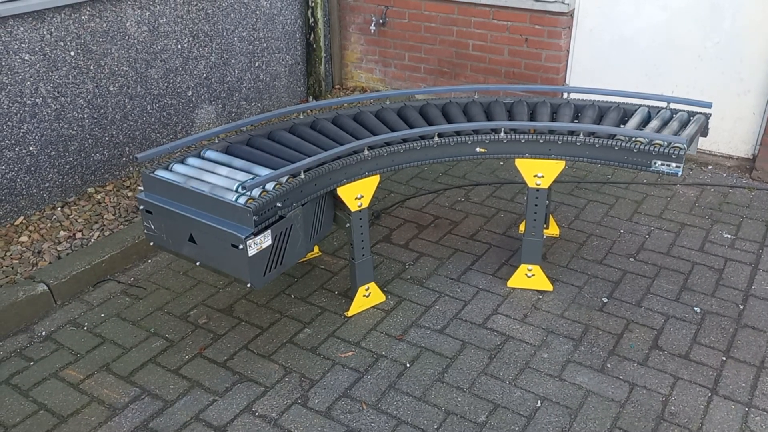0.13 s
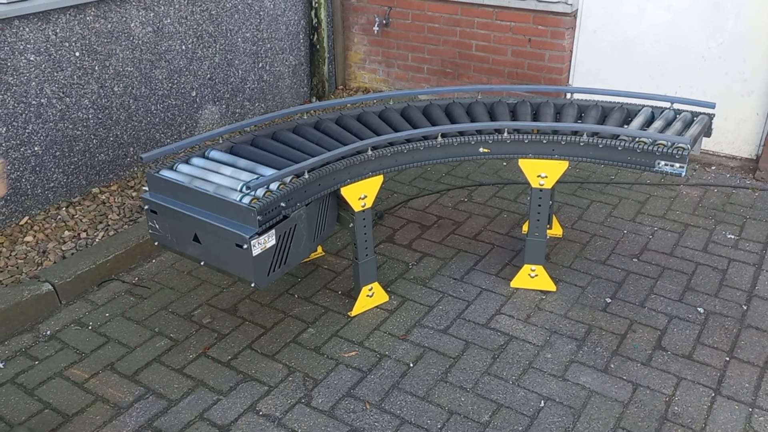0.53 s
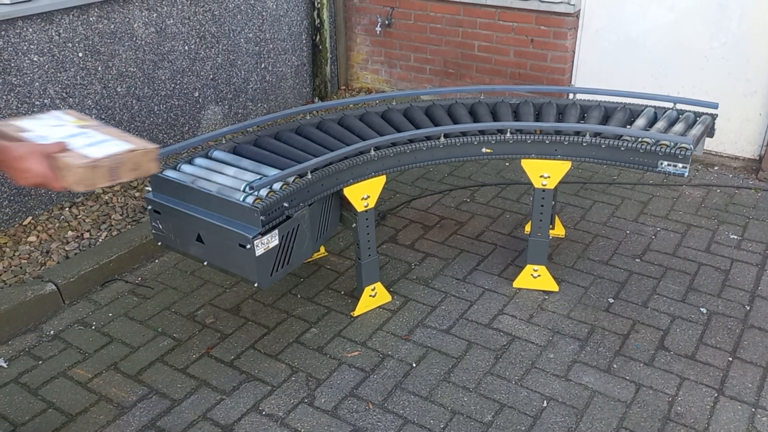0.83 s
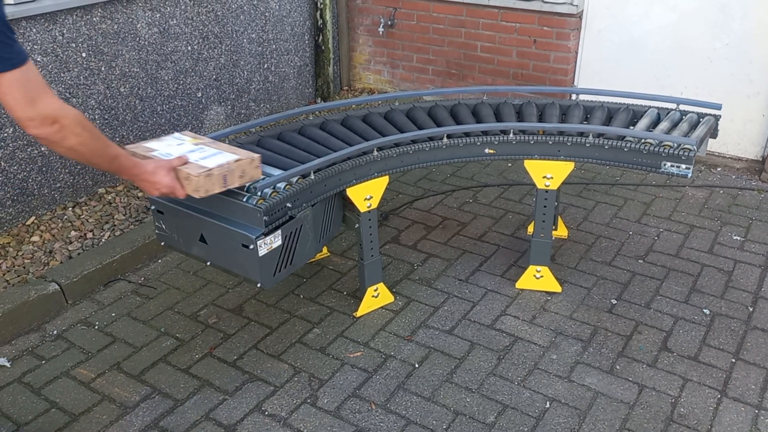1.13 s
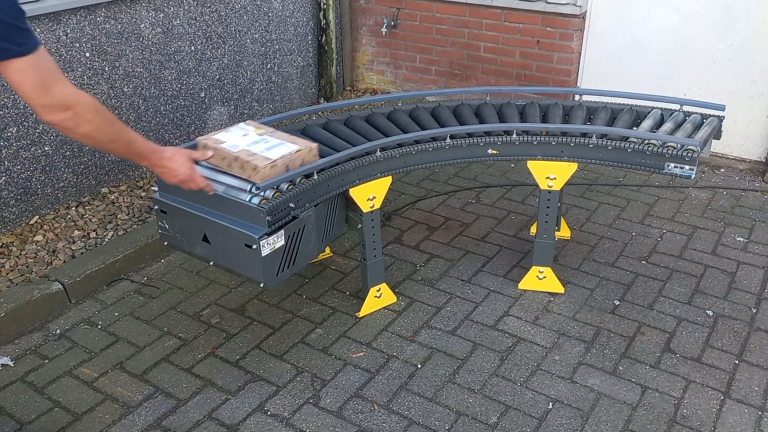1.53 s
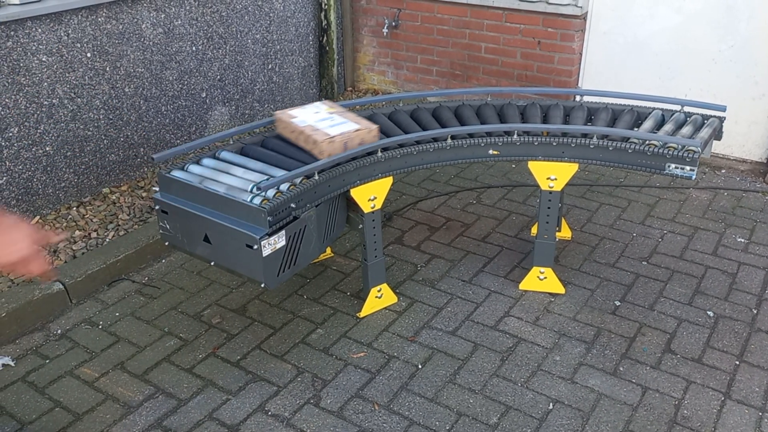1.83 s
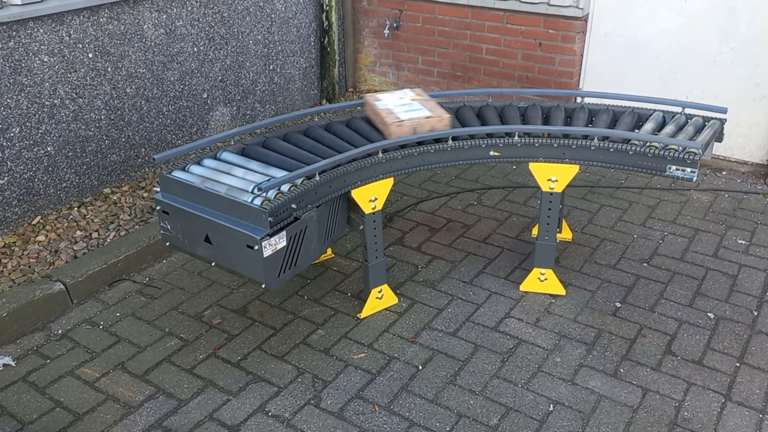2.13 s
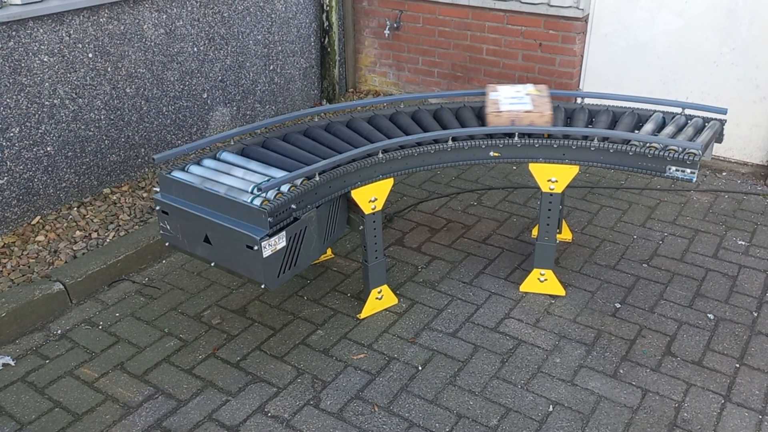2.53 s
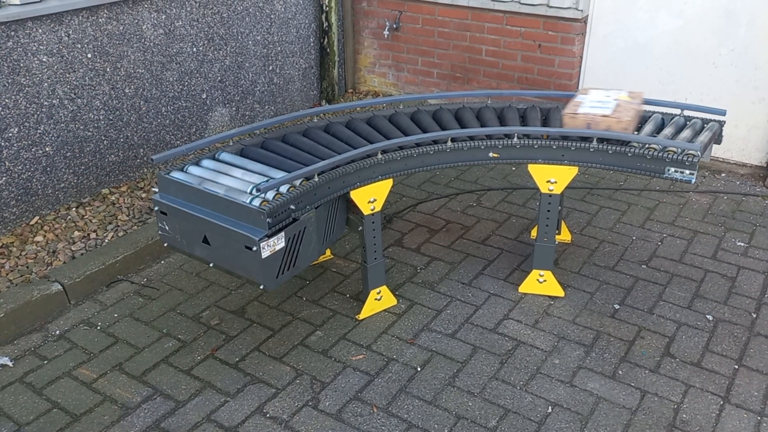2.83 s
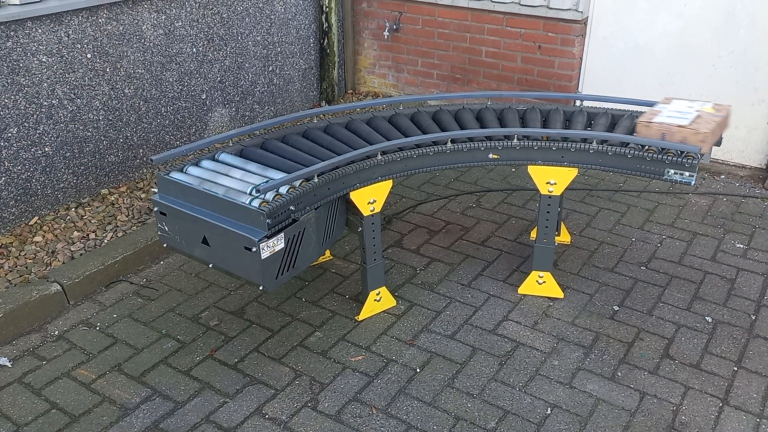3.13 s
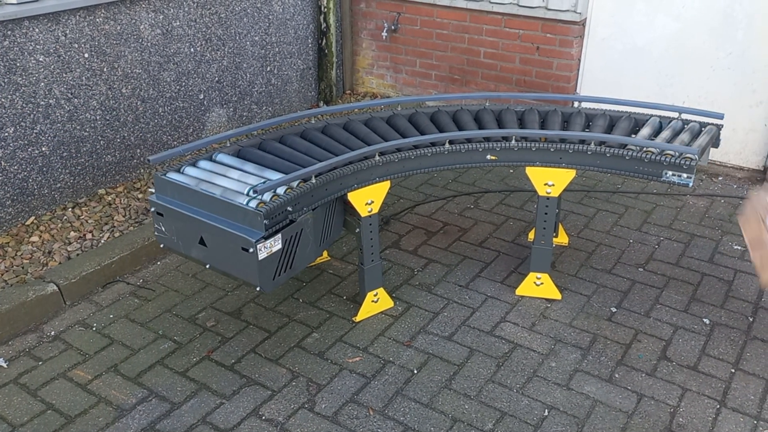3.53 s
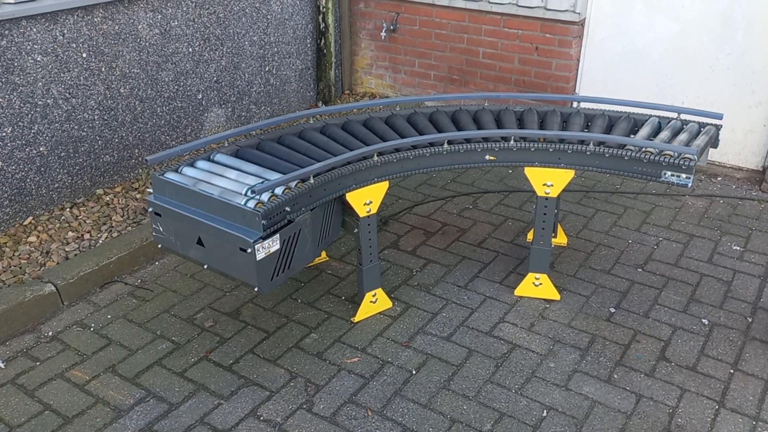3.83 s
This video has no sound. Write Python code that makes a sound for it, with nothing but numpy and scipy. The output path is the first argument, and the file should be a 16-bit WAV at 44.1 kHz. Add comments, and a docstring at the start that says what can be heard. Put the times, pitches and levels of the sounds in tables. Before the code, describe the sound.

A powered roller conveyor drones steadily in a paved yard, with faint whine and tiny ticks. Around 1.3 s a cardboard box is set down with scuffs and soft hollow knocks, then rumbles over rollers until about 3 s, with a tiny squeak near 2.7. It scuffs at 3.3 and lands loudly at 3.7, bouncing until 4, with short wall echo. Rising wind buffets the left; the right is muffled.

```python
"""A paved yard, where a powered roller conveyor drones on. A flat cardboard box is laid on it, knocks
over the rollers, scuffs the end and drops on the paving. Box and rollers are ringing tones with cracks
of noise; drone, whine, scuffs and breeze are shaped noise; ticks and squeaks are brief tones.
A rising breeze buffets the open left microphone port; the right port is covered and muffled."""
import sys
import numpy as np
from scipy import signal
from scipy.fft import rfft, irfft, next_fast_len
from scipy.io import wavfile

SR = 44100
rng = np.random.default_rng(int(sys.argv[2]) if len(sys.argv) > 2 else 0)


def to_wav(sig):
    """Store sig (one row per channel, or 1-D mono) as 16-bit WAV at the path in sys.argv[1].

    Samples outside -1..1 are clipped; the rate is SR.
    """
    pcm = np.clip(np.atleast_2d(sig), -1, 1) * 32767
    pcm = np.round(pcm).astype(np.int16)
    wavfile.write(sys.argv[1], SR, pcm.T)  # frames by channels


N = 176400
T = np.arange(N) / SR  # seconds
SIZE = next_fast_len(N + SR)  # padded length for filtering, in samples


def amp(db):
    """Turn dB into a linear gain."""
    return 10 ** (np.asarray(db) / 20)


def unit(x):
    """Scale to an rms of 1."""
    return x / np.sqrt(np.mean(x ** 2) + 1e-20)


def at_hz(points):
    """Read a (Hz, value) table at every FFT bin, straight lines over log frequency."""
    hz, values = np.transpose(points)
    bins_hz = np.arange(SIZE // 2 + 1) * SR / SIZE
    return np.interp(np.log(bins_hz + 1), np.log(hz), values)


def colour(x, points):
    """Causal minimum-phase filter whose level follows a (Hz, dB) table."""
    log_gain = at_hz(points) * np.log(10) / 20
    # fold the cepstrum onto positive time so that nothing sounds early
    fold = 1 + np.sign(SIZE / 2 - np.arange(SIZE)) - (np.arange(SIZE) == 0)
    response = np.exp(rfft(fold * irfft(log_gain, SIZE)))
    return irfft(rfft(x, SIZE) * response, SIZE)[..., :N]


def curve(rows):
    """Draw a (seconds, dB) table as a line over time, still in dB."""
    s, db = np.transpose(rows)
    return np.interp(T, s, db, left=db[0], right=db[-1])


def drift(rate):
    """Random wander of spread 1: noise under a lowpass near the rate in Hz."""
    step = 40  # samples between wander points
    r = np.exp(-2 * np.pi * rate * step / SR)
    noise = rng.standard_normal(N // step + 2002)
    slow = signal.lfilter([1], [1, -2 * r, r * r], noise)[2000:]  # drop the filter's warm-up
    return np.interp(np.arange(N) / step, np.arange(len(slow)), unit(slow - slow.mean()))


def ring(clicks, hz, t60):
    """Two-pole resonator: a unit click sets off a dying sine that starts from height 1."""
    r, w = amp(-60 / (t60 * SR)), 2 * np.pi * hz / SR
    return signal.lfilter([0, np.sin(w)], [1, -2 * r * np.cos(w), r * r], clicks + 1e-18)


def add(out, s, x):
    """Mix x into out from s seconds on."""
    i = int(s * SR)
    out[i:i + len(x)] += x[:N - i]


def dying(hz, db, t60):
    """A sine that falls 60 dB in t60 seconds."""
    t = T[:int(t60 * SR)]
    return amp(db - 60 * t / t60) * np.sin(2 * np.pi * hz * t)


def spread(x, t60, gap=0.):
    """Scatter into a dying noise tail of unit energy, silent for the first gap seconds."""
    t = T[:int(t60 * SR)]
    tail = rng.standard_normal(SR)[:len(t)] * amp(-60 * t / t60) * (t >= gap)
    return signal.fftconvolve(x, tail / np.sqrt(np.sum(tail ** 2)))[:N]


# Edges of the box meet the paving. Each row: start in seconds, level in dB, crack in dB relative
# to that level, pitch ratio.
LANDING = [(3.692, -10, 2.5, 1.0), (3.7017, -16.5, 9.5, .97), (3.71, -19.5, -2, 0.83),
           (3.742, -27, -4, 0.82), (3.758, -43, 2, 0.8), (3.797, -30.5, 2, 1.11), (3.810, -36, -5, 1.055),
           (3.9242, -22, -3, 0.76), (3.929, -23, 4, 1.24), (3.949, -27, -3, 0.88), (3.976, -36, -5, 0.96),
           (3.989, -41, -2, 1.4)]
# Modes of the box. Each row: frequency in Hz, level in dB, t60 in seconds.
BOX_MODES = [(92, -19, 0.11), (148, -19, .06), (233, -14.5, 0.099), (266, 4, 0.053), (330, -9, 0.072),
             (436, -14, 0.064), (500, -17, 0.094), (620, -10.5, 0.046), (738, -7.5, 0.033),
             (860, -16.5, 0.056), (1005, -11, 0.034), (1188, -18, 0.15), (1396, -22, 0.1),
             (1680, -20, 0.045)]
# Colour of the crack. Each row: frequency in Hz, level in dB.
CRACK_COLOUR = [(200, -37), (500, -8), (1700, -2), (2300, -11), (4000, -10), (8000, -8.5), (12000, -4.5),
                (16000, -7)]
# Colour of the walls' echo. Each row: frequency in Hz, level in dB.
YARD_COLOUR = [(100, -19), (300, -4), (700, 3), (1100, 4), (1700, 0.5), (2600, 4), (4000, 0.5), (16000, -2)]
MAIN_MODE_HZ = BOX_MODES[3][0]
SOFT_DULL = 0.34  # dB lost per octave above the main mode, per dB of softness
BOX_RISE_CYCLES, BOX_LUCK_DB = 0.36, 1.5
BOX_SAG, BOX_SAG_S = 0.14, 0.017  # extra pitch at the strike as a share, time constant of its fall
CRACK_DB, CRACK_T60_S = -10, 0.054
YARD_DB, YARD_T60_S, YARD_GAP_S = -12.5, 0.37, 0.0045


def landing():
    """Each touch rings struck panels that start taut and sag in pitch, and cracks; walls echo it."""
    out, crack, t = np.zeros(N), np.zeros(N), T[:SR // 5]
    taut = t + BOX_SAG * BOX_SAG_S * (1 - np.exp(-t / BOX_SAG_S))
    all_luck = rng.normal(0, BOX_LUCK_DB, (len(LANDING), len(BOX_MODES)))
    for (s, db, crack_db, ratio), luck in zip(LANDING, all_luck):
        dull_db = SOFT_DULL * (db - LANDING[0][1])  # softer touches are duller
        for k, (hz, mode_db, t60) in enumerate(BOX_MODES):
            octaves_up = max(np.log2(hz / MAIN_MODE_HZ), 0)
            start_db = db + mode_db + luck[k] + dull_db * octaves_up
            rise = 1 - np.exp(-t * hz / BOX_RISE_CYCLES)
            shape = amp(start_db - 60 * t / t60) * rise
            sign = (-1) ** (k // 3)
            add(out, s, sign * shape * np.sin(2 * np.pi * hz * ratio * taut))
        add(crack, s, amp(db + crack_db + CRACK_DB - 60 * T[:SR // 2] / CRACK_T60_S))
    out = out + crack * unit(colour(rng.standard_normal(N), CRACK_COLOUR))
    echo = colour(spread(out, YARD_T60_S, YARD_GAP_S), YARD_COLOUR)
    return out + amp(YARD_DB) * echo


# Box bottom meets a roller. Each row: start in seconds, level in dB, pitch in Hz.
KNOCKS = [(1.31, -38, 320), (1.353, -32.5, 338), (1.387, -36, 414), (1.394, -30.5, 263), (1.418, -41, 330),
          (1.892, -36, 288), (1.933, -38.5, 297), (1.968, -37, 318), (2.038, -32.5, 318), (2.053, -39, 315),
          (2.11, -39.5, 330), (2.14, -44, 500), (2.185, -32, 304), (2.204, -36.5, 356), (2.33, -33, 262),
          (2.399, -40, 190), (2.44, -41, 478), (2.474, -34.5, 218), (2.515, -48, 480), (2.552, -41, 227),
          (2.624, -34.5, 181), (2.705, -37.5, 250), (2.774, -33, 234)]
# Tones of one knock. Each row: multiple of the pitch, level in dB, t60 in seconds.
KNOCK_TONES = [(1, 1.5, 0.064), (1.25, -2, 0.032), (1.9, -9.5, 0.036), (3.1, -8.5, 0.021), (5.2, -14, .03)]
KNOCK_RISE_S, KNOCK_LUCK_DB = 0.002, 2.5


def knocks():
    """Hollow knocks: a few dying tones with a soft onset, each knock on its own pitch."""
    out = np.zeros(N)
    all_luck = rng.normal(0, KNOCK_LUCK_DB, (len(KNOCKS), len(KNOCK_TONES)))
    for (s, db, hz), luck in zip(KNOCKS, all_luck):
        for (multiple, tone_db, t60), more_db in zip(KNOCK_TONES, luck):
            tone = dying(multiple * hz, db + tone_db + more_db, t60)
            add(out, s, tone * (1 - np.exp(-T[:len(tone)] / KNOCK_RISE_S)))
    return out


# Level of the box riding the rollers. Each row: time in seconds, level in dB.
RUMBLE = [(1.2, -58), (1.32, -49), (1.4, -46.5), (1.46, -51), (1.8, -54), (1.92, -49.5), (2.2, -48.5),
          (2.3, -52), (2.46, -46), (2.58, -52.5), (2.8, -54.5), (3.0, -49.5), (3.66, -59)]
# Modes of the rollers. Each row: frequency in Hz, level in dB, t60 in seconds.
ROLLERS = [(200, -3.5, 0.09), (234.6, -1, 0.083), (300, 0, 0.09), (353, 3, 0.048), (469, -3, 0.077),
           (563, -14, 0.061), (766, -1, 0.025), (938, 0, .03), (1320, -8, 0.03), (1560, -1.5, 0.02),
           (2300, -7, 0.024)]
RUMBLE_PER_S, RUMBLE_SPREAD_DB = 400, 3.5  # contacts per second, spread of their strength


def rumble():
    """Dense small contacts set the rollers ringing while the box rides."""
    strength = amp(RUMBLE_SPREAD_DB * np.minimum(rng.exponential(1, N), 4))
    clicks = strength * (rng.random(N) < RUMBLE_PER_S / SR)
    out = sum(amp(db) * ring(clicks * rng.standard_normal(N), hz, t60) for hz, db, t60 in ROLLERS)
    fade_in = np.clip((T - RUMBLE[0][0]) / 0.1, 0, 1)
    fade_out = np.clip((RUMBLE[-1][0] - T) / 0.033, 0, 1)
    return amp(curve(RUMBLE)) * fade_in * fade_out * unit(out)


# Short rubbing hisses. Each row: start in seconds, level in dB, length in seconds before the fade,
# dull part in dB relative to the bright part.
SCUFFS = [(0.248, -52.5, 0.1, -23), (0.37, -50, 0.047, -14), (1.305, -42, 0.018, -8.5),
          (1.344, -38.5, .004, -15), (1.361, -54, .004, -8), (1.38, -52.5, 0.033, 6), (1.63, -54, .02, -19),
          (2.324, -63.5, 0.091, 11), (2.469, -59, 0.062, 7.5), (2.729, -54, 0.021, 1),
          (3.315, -37, 0.0066, -14), (3.322, -40.5, 0.0033, -17.5), (3.336, -55, .01, -10),
          (3.726, -44, 0.03, -12), (3.94, -48, 0.016, -3.5)]
# Colour of the bright part. Each row: frequency in Hz, level in dB.
SCUFF_BRIGHT = [(300, -41), (1500, -26), (2100, 2), (4000, -4), (6200, 4.5), (10000, 6), (16000, 8)]
# Colour of the dull part. Each row: frequency in Hz, level in dB.
SCUFF_DULL = [(150, -25), (500, 1.5), (1500, -1), (4500, -8.5), (7000, -17), (16000, -31)]
SCUFF_EDGE_S, SCUFF_FADE_S, SCUFF_GRIT_DB = 0.0042, 0.016, 4


def scuffs():
    """Rubbing as gritty noise, a bright and a dull part, under soft-edged windows."""
    bright, dull = np.zeros(N), np.zeros(N)
    for s, db, long, dull_db in SCUFFS:
        edge = np.clip((T - s) / SCUFF_EDGE_S, 0, 1)
        fade = np.exp(-np.maximum(T - s - long, 0) / SCUFF_FADE_S)
        bright += amp(db) * edge * fade
        dull += amp(db + dull_db) * edge * fade
    bright_noise = unit(colour(rng.standard_normal(N), SCUFF_BRIGHT))
    dull_noise = unit(colour(rng.standard_normal(N), SCUFF_DULL))
    grit = amp(SCUFF_GRIT_DB * drift(150))
    return grit * (bright * bright_noise + dull * dull_noise)


# Tiny bright ticks. Each row: start in seconds, level in dB, frequency in Hz.
TICKS = [(0.0714, -25, 9100), (0.6327, -32, 9100), (0.8276, -39, 9500), (1.1994, -39, 9500),
         (1.6394, -41, 8500), (3.647, -36.5, 6200)]
TICK_T60_S = 0.0015


def ticks():
    """Very short rings of three tones."""
    out = np.zeros(N)
    for s, db, hz in TICKS:
        for multiple, more_db in [(1, 0), (0.59, -16), (1.32, 6.5)]:
            add(out, s, dying(multiple * hz, db + more_db, TICK_T60_S))
    return out


# A bearing squeaks. Each row: start in seconds, level in dB, length in seconds.
SQUEAKS = [(2.73, -49.5, 0.012), (2.746, -54, .008)]
# Tones of a squeak. Each row: frequency in Hz, level in dB.
SQUEAK_TONES = [(2080, 0), (3230, -1), (7700, 1)]


def squeaks():
    """Bearing squeaks: three steady tones under a half-sine swell."""
    out = np.zeros(N)
    for s, db, long in SQUEAKS:
        t = T[:int(long * SR)]
        tones = sum(amp(db + tone_db) * np.sin(2 * np.pi * hz * t) for hz, tone_db in SQUEAK_TONES)
        add(out, s, np.sin(np.pi * t / long) * tones)
    return out


# A tap on the right port's cover. Each row: frequency in Hz, level in dB, t60 in seconds.
TAP = [(216, -32.5, 0.074), (110, -42, 0.16), (820, -30, 0.013)]
TAP_S = 0.363


def tap():
    """A tap on the cover rings a few dying tones at once."""
    out = np.zeros(N)
    for hz, db, t60 in TAP:
        add(out, TAP_S, dying(hz, db, t60))
    return out


# Rumble of air on the left port. Each row: time in seconds, level in dB.
BREEZE = [(0, -49.5), (.12, -68), (.3, -56.5), (.45, -48.5), (.55, -70), (1.22, -62), (1.3, -50),
          (1.42, -56), (1.65, -71.5), (1.86, -77), (2.15, -50.5), (2.28, -61), (2.5, -51), (2.96, -47),
          (3.24, -41.5), (3.5, -36.5), (3.65, -47), (4.0, -36.5)]
# Eddies hitting the left port. Each row: centre in seconds, level in dB, frequency in Hz.
BUFFETS = [(0.455, -40, 94), (1.296, -36.5, 99), (2.422, -45, 92), (2.529, -37, 110), (2.637, -36.5, 113),
           (2.892, -39, 102), (2.912, -47, 111), (3.008, -29.5, 148), (3.023, -24, 110), (3.124, -39, 107),
           (3.164, -34, 89), (3.209, -31, 110), (3.288, -37.5, 148), (3.328, -31.5, 112),
           (3.36, -27.5, 109), (3.396, -25, 99), (3.451, -30, 99), (3.474, -29.5, 123), (3.539, -28, 106),
           (3.59, -43, 136), (3.67, -43, 121), (3.808, -20.5, 166), (3.841, -39, 106), (3.865, -24, 112),
           (3.895, -23, 196), (3.913, -23, 93), (0.387, -52, 110), (.418, -46, 119), (0.301, -48, 98),
           (1.33, -35.5, 149), (1.359, -39.5, 121), (1.579, -46.5, 89.5), (1.94, -42.5, 101),
           (3.517, -28.5, 200), (3.559, -36, 130), (3.688, -22.5, 137), (3.82, -26.5, 112),
           (3.879, -40, 110), (3.965, -34, 122)]
BREEZE_HZ, BREEZE_LUMPY_DB, LUMPS_PER_S = [53.6, 130], 4.5, 12.4
BUFFET_CYCLES = 0.67  # half width of the swell


def wind():
    """Air on the open port: lumpy low noise plus single eddies, each a brief low swell."""
    band = signal.butter(2, BREEZE_HZ, "band", fs=SR, output="sos")
    low_noise = signal.sosfilt(band, rng.standard_normal(N))
    lumps = amp(BREEZE_LUMPY_DB * drift(LUMPS_PER_S))
    out = amp(curve(BREEZE)) * unit(lumps * low_noise)
    phases = rng.uniform(0, 2 * np.pi, len(BUFFETS))
    for (s, db, hz), phase in zip(BUFFETS, phases):
        cycles = hz * (T[:SR // 10] - .05)  # counted from the centre
        swell = np.exp(-(cycles / BUFFET_CYCLES) ** 2)
        add(out, s - .05, amp(db) * swell * np.sin(2 * np.pi * cycles + phase))
    return out


# Drive whine. Each row: frequency in Hz, width in Hz, level in dB.
HUM = [(484.8, 6.7, -63.5), (552.5, 7.6, -65), (1112, 11, -68), (1202, 11, -70)]


def hum():
    """Faint wavering lines of the drive: noise in narrow resonances."""
    out = np.zeros(N)
    for hz, width, db in HUM:
        t60 = np.log(1000) / np.pi / width
        out += amp(db) * unit(ring(rng.standard_normal(N), hz, t60))
    return out


# How alike the ports are. Each row: frequency in Hz, share common to both ports from 0 to 1.
LIKENESS = [(60, 0.94), (300, 0.9), (600, 0.98), (1100, 1), (1600, 0.13), (16000, .1)]


def both_ports(x, other):
    """The right port hears a share of the left's sound, the rest by another path."""
    alike = np.clip(at_hz(LIKENESS), 0, 1)
    right = alike * rfft(x, SIZE) + np.sqrt(1 - alike ** 2) * rfft(other, SIZE)
    return np.array([x, irfft(right, SIZE)[:N]])


# Colour of drive, belts and far traffic. Each row: frequency in Hz, level in dB.
DRONE = [(40, -14.5), (70, -9.5), (130, -7), (260, 0.5), (350, 0), (440, -0.5), (520, -4), (620, -5),
         (850, -11.5), (1200, -3.5), (1500, -7), (1850, -12), (2500, -10), (7000, -15), (11000, -15.5),
         (16000, -14.5)]
DRONE_DB, DRONE_PATCHY_DB = -48.5, 0.66


def drone():
    """Drive, belts and traffic as coloured noise; octave bands waver a little, each in its own way."""
    white, out = both_ports(rng.standard_normal(N), rng.standard_normal(N)), 0
    spectrum = rfft(white)
    octave = np.log2(np.arange(N // 2 + 1) * SR / N / 60 + 1e-9)  # counted from 60 Hz
    for k in range(9):
        share = np.clip(1 - np.abs(np.clip(octave, 0, 8) - k), 0, 1)
        out = out + irfft(spectrum * share, N) * amp(DRONE_PATCHY_DB * drift(3.9))
    return amp(DRONE_DB) * unit(colour(out, DRONE))


PORTS_APART_T60_S = 0.03


def scene():
    """Box and conveyor reach both ports, the breeze only the left, the tap only the right."""
    box = landing() + knocks() + rumble() + scuffs() + ticks() + squeaks() + hum()
    left, right = drone() + both_ports(box, spread(box, PORTS_APART_T60_S))
    return np.array([left + wind(), right + tap()])


# Response of the open left port. Each row: frequency in Hz, level in dB.
OPEN = [(25, -17.5), (60, 4.5), (100, 6), (2500, 3.5), (2900, 0.5), (3250, 7), (3800, 5), (5200, 4),
        (5600, -2.5), (6600, -3.5), (7000, -1), (8300, -11), (9500, -9.5), (12000, -10), (15000, -9.5),
        (15800, 2), (16000, -6), (16300, -37)]
# Response of the covered right port. Each row: frequency in Hz, level in dB.
COVER = [(25, -33), (60, -13), (100, -6), (350, -8.5), (520, -4.5), (600, -1), (850, -8.5), (1150, -8.5),
         (1600, -7.5), (2050, 3.5), (2400, -5.5), (2600, 0.5), (3000, -29), (3450, -14), (4000, -24.5),
         (5200, -29.5), (5600, -40), (16000, -42)]
# Colour of the right port's hiss. Each row: frequency in Hz, level in dB.
HISS = [(5000, -2), (9500, 0), (12000, 4.5), (16000, 1)]
LAG_S, HISS_DB, CUTOFF_HZ = 0.00015, -82.5, 16450
TOP = 1.13  # peaks are rounded towards this height


def record(dry):
    """Open left port, muffled late right port with faint hiss; peaks rounded, top treble cut."""
    left = colour(dry[0], OPEN)
    muffled = np.interp(T - LAG_S, T, colour(dry[1], COVER))
    right = muffled + amp(HISS_DB) * colour(rng.standard_normal(N), HISS)
    rounded = TOP * np.tanh(np.array([left, right]) / TOP)
    lowpass = signal.cheby2(14, 70, CUTOFF_HZ, fs=SR, output="sos")
    return signal.sosfilt(lowpass, rounded)


dry = scene()
out = record(dry)
to_wav(out)
```